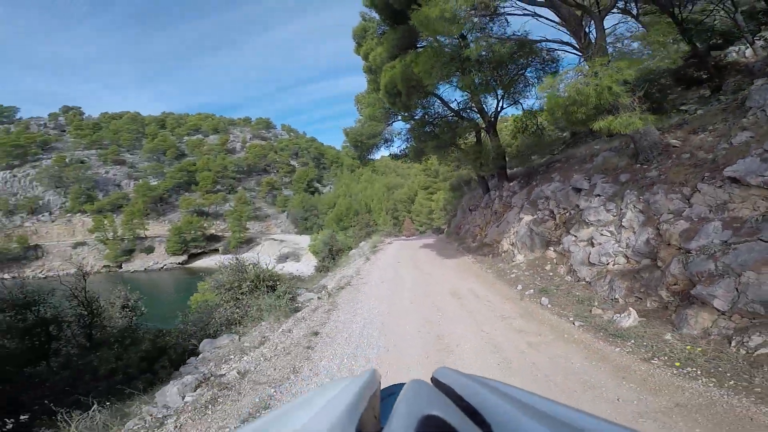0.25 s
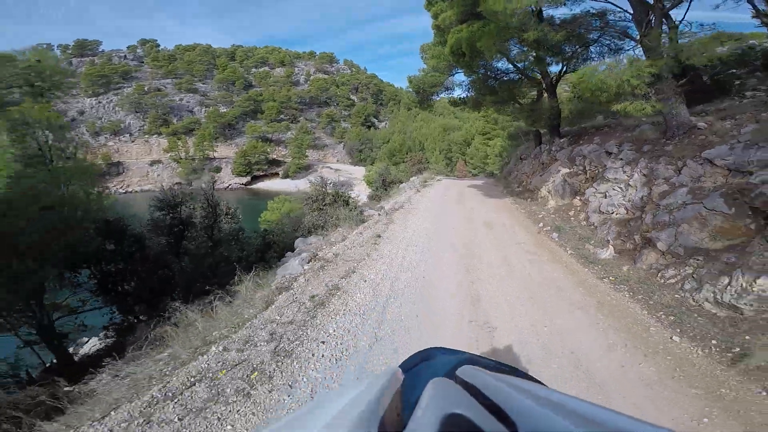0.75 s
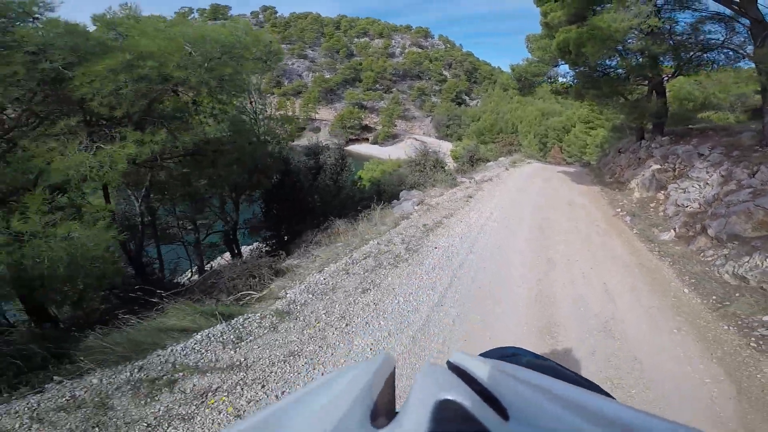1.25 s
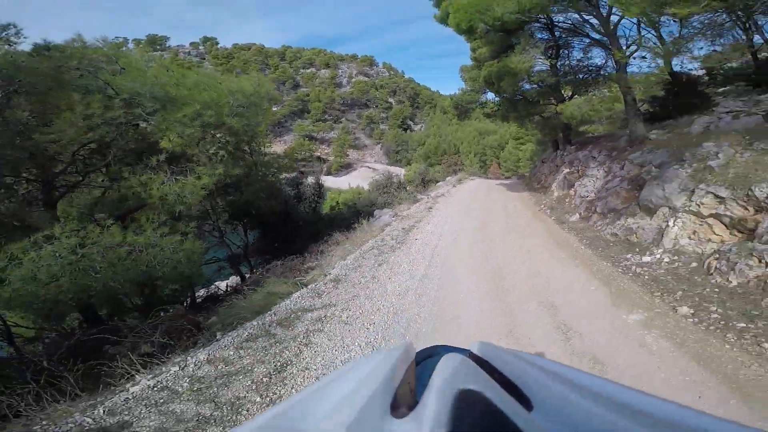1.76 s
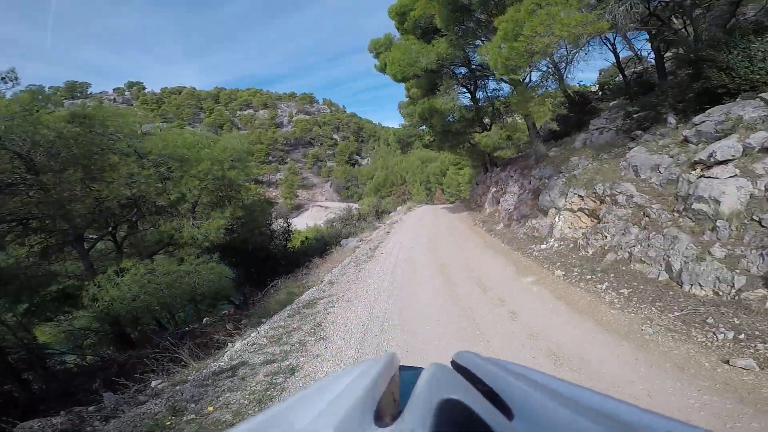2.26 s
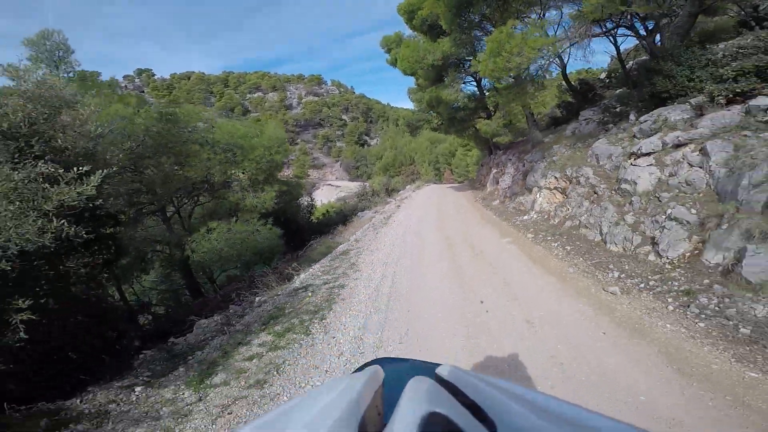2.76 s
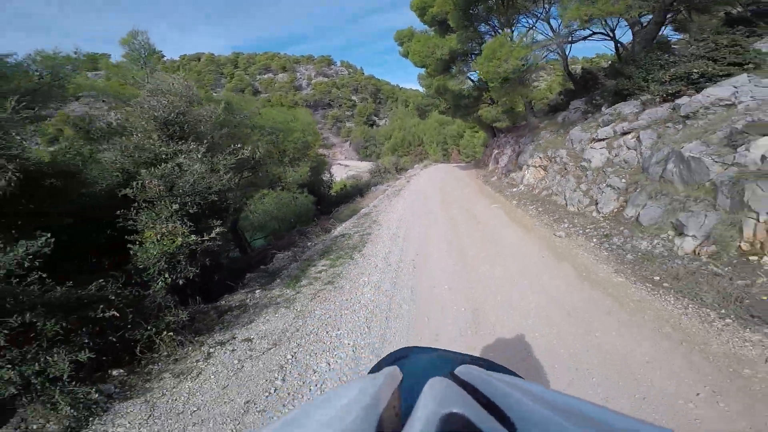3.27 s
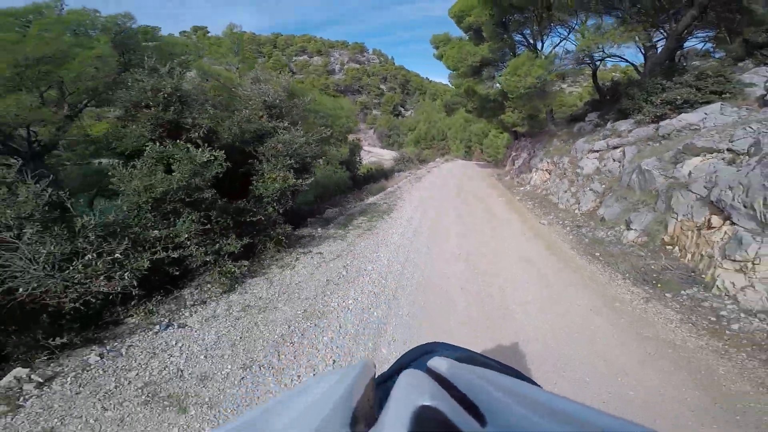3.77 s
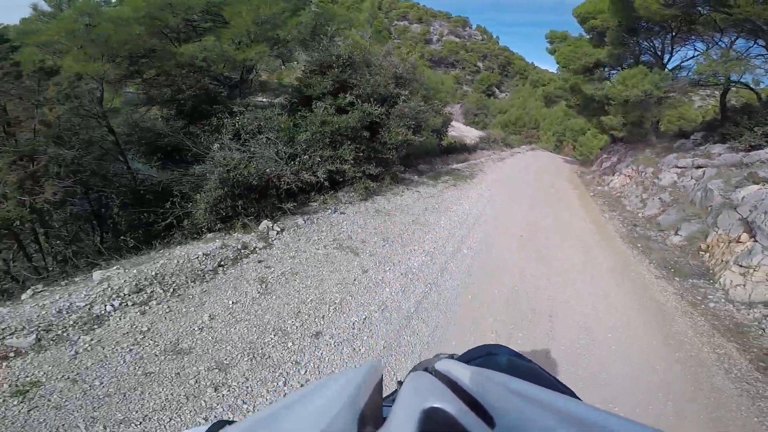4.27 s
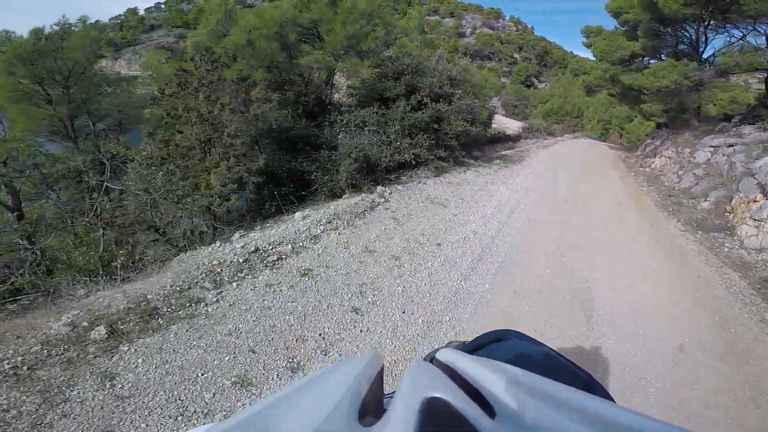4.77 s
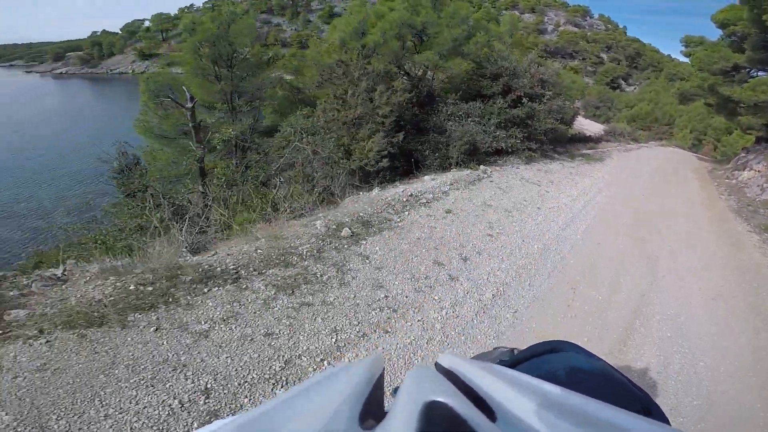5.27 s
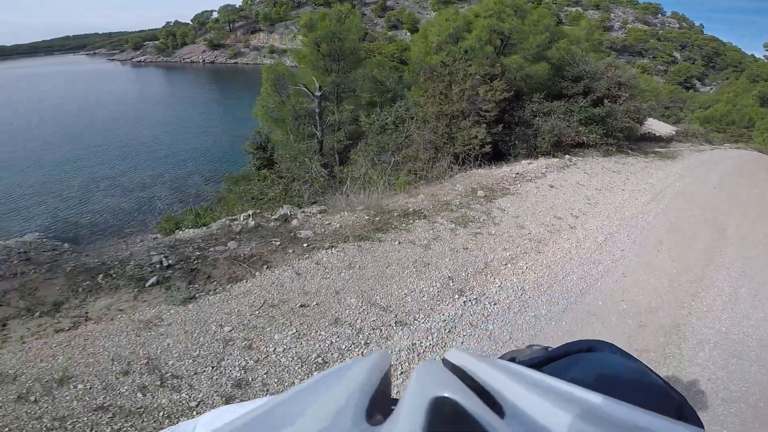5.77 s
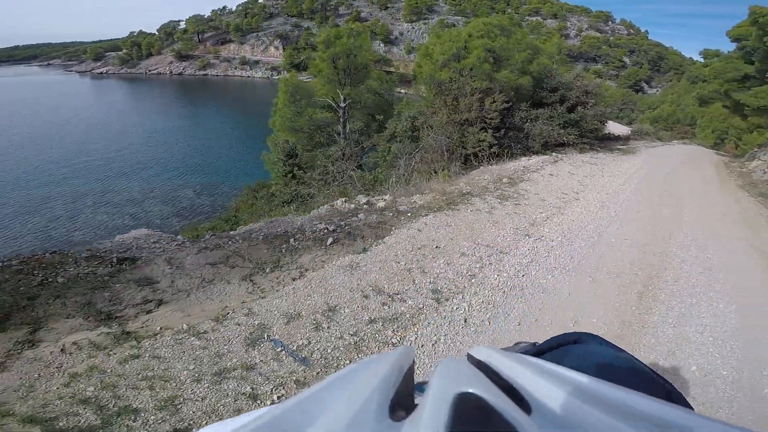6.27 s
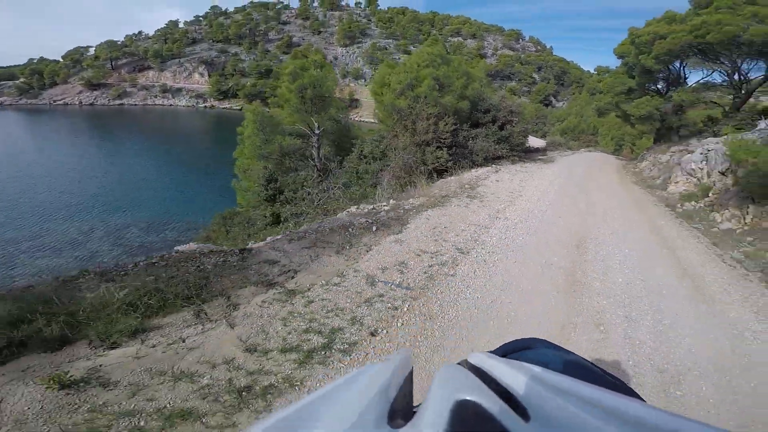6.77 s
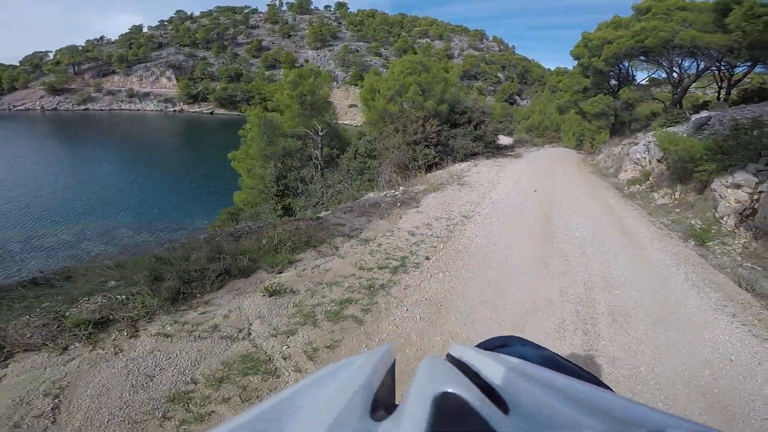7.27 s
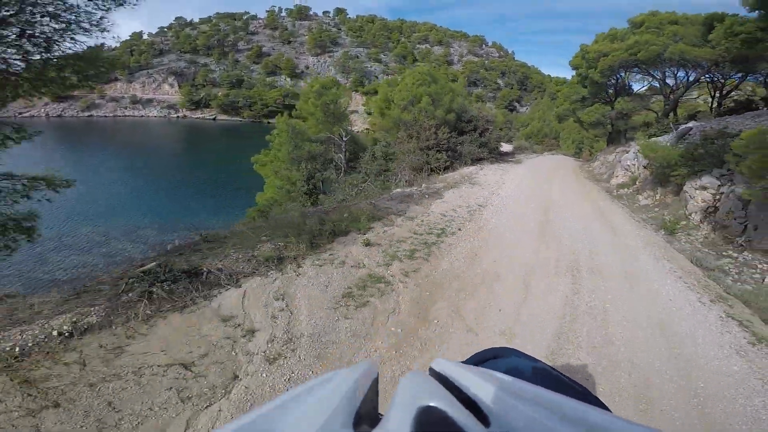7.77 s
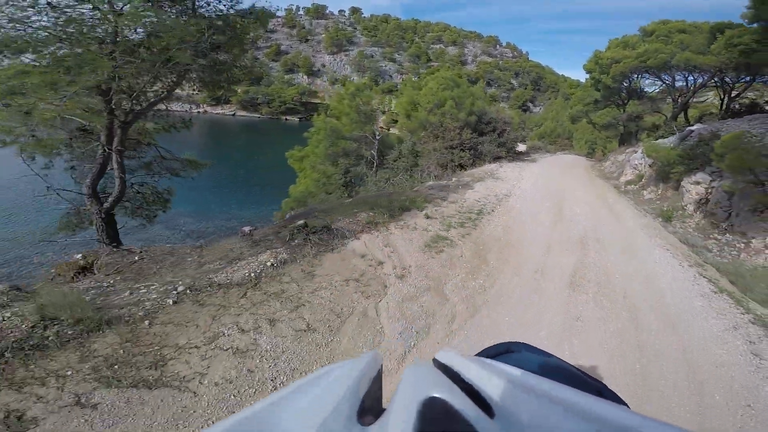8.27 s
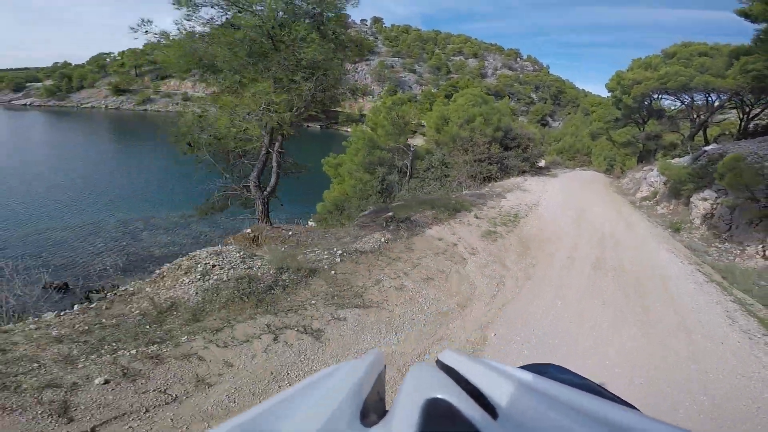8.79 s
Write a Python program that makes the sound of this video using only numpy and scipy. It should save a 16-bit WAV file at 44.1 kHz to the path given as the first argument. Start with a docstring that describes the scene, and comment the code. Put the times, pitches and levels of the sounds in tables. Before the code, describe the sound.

Low wind thuds and rumbles over a close microphone while bicycle tyres crackle through gravel, loose parts clicking and bumps booming dully.

```python
"""On a loose gravel track a bicycle rolls along, heard from a camera riding just above the helmet.
Wind is slow and deep noise that swells in gusts; bumps set the resonances of the camera mount ringing.
Tyres crunch as clumps of tiny random contacts ring the bicycle and the grit; pebbles snap and one stone pops.
Loose parts clack as short buzzes with a strike, a brake rubs in two touches as a wavering tone with
overtones, and a thin steady hiss with a faint whine lies on top."""
import sys
import numpy as np
from scipy import signal
from scipy.fft import rfft, irfft, next_fast_len
from scipy.io import wavfile
from scipy.ndimage import uniform_filter1d

SR = 44100
rng = np.random.default_rng(int(sys.argv[2]) if len(sys.argv) > 2 else 0)


def inscribe(sig):
    """Save sig as 16-bit PCM at rate SR to the path in sys.argv[1].

    A 1-D sig is mono; a 2-D sig holds one channel per row.
    Samples are clipped to [-1, 1] before scaling.
    """
    pcm = np.round(np.clip(np.atleast_2d(sig).T, -1, 1) * 32767)
    wavfile.write(sys.argv[1], SR, pcm.astype(np.int16))


N = 398223  # length in samples, about 9 s
TIME_S = np.arange(N) / SR
LEAD_S = 0.008  # the soft onset of pebbles and buzzes starts this long before their listed time


def from_db(db):
    """Turn decibels into a gain."""
    return 10 ** (np.asarray(db) / 20)


def rms_one(x):
    """Scale a signal to unit power."""
    return x / np.sqrt(np.mean(x ** 2) + 1e-20)


def in_time(rows):
    """Draw each column of a timed table as a curve with a value at every sample."""
    s, *columns = np.transpose(rows)
    return [np.interp(TIME_S, s, column) for column in columns]


def swells(rows, base_db, attack_s, release_s):
    """A level in dB that rises from its base, holds and falls back for each row."""
    rise_db = np.zeros(N)
    for s, length_s, db in rows:
        corners_s = [s - attack_s, s, s + length_s, s + length_s + release_s]
        shape = np.interp(TIME_S, corners_s, [0, 1, 1, 0])
        rise_db = np.maximum(rise_db, (db - base_db) * shape)
    return base_db + rise_db


def drift(rate_hz):
    """Slow random wandering with spread 1, computed at every 40th sample."""
    r = np.exp(-80 * np.pi * rate_hz / SR)
    slow = signal.lfilter([1], [1, -2 * r, r * r], rng.standard_normal(N // 40 + 2002))
    slow = slow[2000:]  # skip the filter's start
    return np.interp(np.arange(N) / 40, np.arange(len(slow)), rms_one(slow))


def noise(spectrum):
    """Noise of unit power whose colour follows a spectrum table."""
    size = next_fast_len(N)
    hz, db = np.transpose(spectrum)
    bins_hz = np.maximum(np.arange(size // 2 + 1) * SR / size, 1)
    gain = from_db(np.interp(np.log(bins_hz), np.log(hz), db, left=-120, right=-120))
    return rms_one(irfft(rfft(rng.standard_normal(size)) * gain, size)[:N])


def evened(x, seconds):
    """Hold the slow level of a signal near one."""
    size = max(int(seconds * SR), 2)
    power = uniform_filter1d(uniform_filter1d(x ** 2, size), size)
    return x / np.sqrt(power + 1e-9)


def resonate(x, modes):
    """Ring side-by-side resonances of alternating sign; a narrower one rings longer."""
    out = 0
    for k, (hz, width_hz, db) in enumerate(modes):
        r = np.exp(-np.pi * width_hz / SR)
        poles = [1, -2 * r * np.cos(2 * np.pi * hz / SR), r * r]
        ring = signal.lfilter([1, 0, -1], poles, x + 1e-18)
        out = out + (-1) ** k * from_db(db) * (1 - r * r) / 2 * ring
    return out


def soften(x, edge_hz):
    """A blunt contact carries little treble."""
    return signal.sosfilt(signal.butter(2, min(edge_hz, .45 * SR), fs=SR, output="sos"), x)


def grains(per_s, spread_db, clump_db):
    """Random contacts, mostly small, that come in clumps."""
    born = rng.random(N) < per_s * from_db(clump_db * drift(14)) / SR
    sizes = from_db(spread_db * np.minimum(rng.exponential(1, N), 4))
    return born * sizes * rng.choice([-1, 1], N)


def blow(modes, chatter, chatter_s, edge_hz):
    """One contact and its dying chatter set modes ringing; peak 1."""
    t = np.arange(SR // 6) / SR
    force = chatter * rng.standard_normal(len(t)) * np.exp(-t / chatter_s)
    force[0] = 1
    ring = soften(resonate(force, modes), edge_hz)
    return ring / np.abs(ring).max()


def add(out, s, sound):
    """Mix a short sound in at time s."""
    start = int(np.clip(s * SR, 0, N - 1))
    out[start:start + len(sound)] += sound[:N - start]


# gusts on the microphone: start_s, length_s, level_db (before the buffeting trim)
WIND_GUSTS = [(0.12, 0.14, -17.5), (0.6, 0.14, -19.5), (0.89, 0.11, -17), (1.18, 0.16, -15),
              (1.55, 0.035, -18), (1.96, 0.14, -13.5), (2.35, .08, -23), (2.57, 0.054, -14),
              (2.91, 0.071, -18), (3.1, 0.2, -18.5), (3.37, 0.12, -13.5), (3.57, 0.064, -14),
              (3.96, 0.16, -14.5), (4.24, 0.081, -11.5), (4.4, 0.49, -18.5), (4.96, 0.18, -15),
              (5.26, 0.068, -12), (5.43, 0.11, -15), (5.61, 0.069, -13), (5.75, 0.079, -18.5),
              (6.12, 0.3, -16), (6.56, 0.14, -17.5), (6.73, 0.073, -12), (6.86, 0.11, -13.5),
              (7.06, 0.11, -19), (7.23, 0.041, -17.5), (7.38, 0.24, -22), (7.95, 0.068, -13.5),
              (8.6, 0.35, -19)]
# colour of the deep buffeting: pitch_hz, level_db (per Hz, relative)
BUFFET_COLOUR = [(11, 2), (16, -0.5), (20, 4.5), (25, -3), (33, -7.5), (41, -12), (51, -18), (63, -23.5),
                 (85, -33.5), (130, -37.5), (300, -61)]
# colour of the softer rush: pitch_hz, level_db (per Hz, relative)
RUSH_COLOUR = [(40, 1), (62, 10.5), (85, 10), (150, 5.5), (220, 0), (300, -3), (400, -8), (550, -11),
               (720, -14.5), (1200, -17.5), (2000, -24), (4000, -40)]


def wind(headwind_db=-24, attack_s=0.04, release_s=0.067, buffet_trim_db=-5.0,
         sway_db=-23.5, sway_hz=10.4, sway_width_hz=5.76, sway_follows=0.77,
         rush_db=-46.0, rush_follows=0.05, flutter_db=1.5):
    """Large eddies sway the air, smaller ones thud on the port; a softer rush swells slightly with them."""
    level_db = swells(WIND_GUSTS, headwind_db, attack_s, release_s)
    gust_db = level_db - level_db.mean()
    band = [(sway_hz, sway_width_hz, 0)]
    eddies = resonate(resonate(rng.standard_normal(N), band), band)
    sway = from_db(sway_db + sway_follows * gust_db) * evened(eddies, seconds=0.23)
    buffet = from_db(level_db + buffet_trim_db) * evened(noise(BUFFET_COLOUR), seconds=0.081)
    rush_level_db = rush_db + rush_follows * gust_db + flutter_db * drift(25.5)
    rush = from_db(rush_level_db) * noise(RUSH_COLOUR)
    # 10 ms fades at both ends
    ease = np.interp(TIME_S, [0, .01, N / SR - .01, N / SR], [0, 1, 1, 0])
    return ease * (sway + buffet + rush)


# stony stretches of the track: start_s, length_s, roughness_db (over the usual ground)
STONY_STRETCHES = [(0.15, 0.17, -2), (1.23, 0.2, 3.5), (1.95, 0.11, 4), (2.25, 0.39, 0.5), (2.9, 0.1, 5),
                   (3.36, 0.03, 5.5), (4.03, 0.24, 4), (4.84, 0.26, 5.5), (5.3, 0.39, 3), (5.88, 0.46, 2.5),
                   (6.68, 0.23, 3.5), (7.15, 0.12, 2), (7.93, 0.21, 2.5), (8.63, 0.53, 3)]


def track_roughness():
    """Roughness in dB that rises and falls as the wheels cross stony stretches."""
    return swells(STONY_STRETCHES, 0, attack_s=0.078, release_s=0.054)


# bumps that jolt the mount: start_s, level_db (before trim), hardness_hz (a harder push reaches higher)
MOUNT_BUMPS = [(0.238, -22.5, 131), (2.289, -26.5, 170), (2.563, -20, 300), (2.908, -15.5, 393),
               (2.95, -17.5, 260), (3.155, -25.5, 150), (3.399, -14.5, 380), (3.4068, -17.5, 280),
               (4.081, -17, 328), (4.854, -20, 110), (4.919, -25.5, 110), (5.006, -22, 149),
               (5.172, -21, 130), (5.333, -23, 109), (5.409, -24, 130), (5.623, -23, 130),
               (6.829, -22, 150), (6.934, -35, 150), (7.234, -29.5, 150), (8.008, -26, 170)]
# resonances of the camera mount: pitch_hz, width_hz, level_db (relative)
MOUNT_MODES = [(94.4, 37.2, -6), (128.4, 11.7, 5), (176, 8, -8.5), (263, 51, -21), (296.6, 50, -17.5),
               (388, 230, -31.5)]


def mount(rough_db, shake_db=-49, shake_follows=1.94, bump_trim_db=-5.0, judder=0.005, judder_s=0.052,
          hardening_db=4.5, punch_s=0.02, settle_s=0.013, after_db=-1.0,
          lurch_hz=48, lurch_width_hz=22, lurch_db=-13.0, thud_hz=230, thud_width_hz=260, thud_db=-19.5):
    """Rough ground keeps the mount humming; a bump thuds, swings it with a fading judder and lurches deeply."""
    hum = evened(resonate(rng.standard_normal(N), MOUNT_MODES), seconds=0.13)
    out = from_db(shake_db + shake_follows * rough_db) * hum
    lurch_mode = [(lurch_hz, lurch_width_hz, 0)]
    thud_mode = [(thud_hz, thud_width_hz, 0)]
    for s, db, hardness_hz in MOUNT_BUMPS:
        # a harder push excites the upper modes and the thud more
        lift_db = hardening_db * np.log2(hardness_hz / MOUNT_MODES[2][0])
        upper = [(hz, width_hz, level_db + lift_db) for hz, width_hz, level_db in MOUNT_MODES[2:]]
        swing = blow(MOUNT_MODES[:2] + upper, judder, judder_s, edge_hz=292)
        # after the first punch the swing eases slightly
        t = np.arange(len(swing)) / SR
        settling_db = np.interp(t, [punch_s, punch_s + settle_s], [0, after_db])
        lurch = from_db(lurch_db) * blow(lurch_mode, judder, judder_s, edge_hz=140)
        thud = from_db(thud_db + lift_db) * blow(thud_mode, judder, judder_s, edge_hz=324)
        add(out, s, from_db(db + bump_trim_db) * (from_db(settling_db) * swing - lurch - thud))
    return out


# resonances of the bicycle and helmet shell, also rung by the knocks: pitch_hz, width_hz, level_db (relative)
BODY_MODES = [(565, 50, -1), (851, 109, -1), (1053, 239, 0), (1258, 139, 2), (1343, 55, 1.5),
              (1676, 77, -4.5), (1896, 164, -16), (2430, 590, -18.5), (2890, 120, -17), (3910, 330, -17),
              (4330, 430, -14.5), (5920, 460, -14)]


def stones(rough_db, crunch_db=-62.5, growth_db_per_s=0.1747, edge_hz=3500, patch_db=3.0):
    """Stones shift under the tread in small slides and sound the bicycle's modes; the track gets coarser."""
    contacts = from_db(patch_db * drift(46)) * grains(per_s=480, spread_db=3.0, clump_db=3.5)
    crunch = rms_one(resonate(soften(contacts, edge_hz), BODY_MODES))
    return from_db(crunch_db + growth_db_per_s * TIME_S + rough_db) * crunch


# loose fine grit under the tyres, also guiding stray pebbles: time_s, level_db (before trim)
LOOSE_GRIT_LEVEL = [(0, -67), (.75, -71.5), (1.15, -69.5), (1.7, -70), (2.1, -65), (2.7, -69.5),
                    (3.35, -70.5), (3.65, -77.5), (4.1, -70.5), (4.5, -80.5), (4.9, -69.5), (5.5, -71),
                    (5.75, -65.5), (6.1, -69.5), (6.8, -73.5), (7.6, -67.5), (8.5, -73.5), (9.03, -70.5)]
# pitch that the grit favours, also used for stray pebbles: time_s, pitch_hz
FAVOURED_PITCH = [(0, 2850), (1.3, 3780), (2.1, 3070), (3.4, 3250), (4.5, 2060), (5.9, 3500), (7.3, 2060),
                  (9, 2260)]
# resonances of the grit: pitch_hz, width_hz, level_db (relative)
GRIT_MODES = [(1555, 180, 3), (2173, 65, 4.5), (2480, 130, -1), (2890, 93, 1.5), (3570, 130, -3.5),
              (3900, 160, -7.5), (4220, 220, -6), (6000, 340, -13)]


def grit(trim_db=-0.6, focus_db=7.5, focus_octaves=0.44, own_share=0.66, patch_db=1.0, edge_hz=7000):
    """Fine grit crackles in patches; finer grit rings higher, and modes near the favoured pitch are lifted."""
    level_db, = in_time(LOOSE_GRIT_LEVEL)
    favoured_hz, = in_time(FAVOURED_PITCH)
    shared = grains(per_s=300, spread_db=2.5, clump_db=2.5)
    out = 0
    for hz, width_hz, db in GRIT_MODES:
        # every mode hears the shared contacts plus some of its own
        own = own_share * grains(per_s=260, spread_db=2.5, clump_db=6.0)
        contacts = shared * rng.choice([-1, 1], N) + own
        nearness = np.exp(-(np.log2(hz / favoured_hz) / focus_octaves) ** 2)
        out = out + from_db(focus_db * nearness) * resonate(contacts, [(hz, width_hz, db)])
    crackle = rms_one(from_db(patch_db * drift(40)) * soften(out, edge_hz))
    return from_db(level_db + trim_db) * crackle


def stray_pebbles(count=290, over_grit_db=12, spread_db=3, spread_octaves=.25, clack_db=5.5):
    """Draw extra pebbles at random, in clusters where the grit lies loose and near its favoured pitch."""
    grit_db, = in_time(LOOSE_GRIT_LEVEL)
    favoured_hz, = in_time(FAVOURED_PITCH)
    chance = np.cumsum(from_db(grit_db + 5 * drift(6)))
    strays = []
    for i in np.searchsorted(chance, chance[-1] * rng.random(size=count)):
        hz = favoured_hz[i] * 2 ** (spread_octaves * rng.uniform(-1.16, 1))
        db = grit_db[i] + over_grit_db + spread_db * rng.normal()
        strays.append((i / SR, hz, db, clack_db))
    return strays


# pebbles that snap against each other: start_s, pitch_hz, level_db (before trim), clack_db (before lift)
SNAPPING_PEBBLES = [(0.038, 3000, -43.5, 2.5), (0.110, 3400, -54, -8), (0.141, 2900, -49, 4),
                    (0.262, 3730, -50, -5), (0.275, 3660, -45.5, -8), (0.354, 2890, -44, 10),
                    (0.472, 3500, -56, -8), (0.635, 3350, -54, -11), (0.871, 3650, -48, -2),
                    (1.069, 3760, -52, -13), (1.189, 3950, -50, -2), (1.377, 3900, -51, -2),
                    (1.634, 3750, -52, 3), (1.877, 3540, -50, -6), (1.901, 3120, -47, 2),
                    (1.998, 3000, -49, 3), (2.157, 3400, -51, -5), (2.219, 2980, -46.5, -4),
                    (2.444, 2690, -48, -2), (2.697, 3430, -50.5, -8), (2.890, 3630, -51, -4),
                    (2.930, 3180, -43, 4), (2.9465, 3000, -44.5, -5), (3.3455, 2870, -44, -1),
                    (3.366, 2400, -51, -8), (3.9055, 3000, -51, 3), (5.646, 3900, -51, -4),
                    (5.662, 3500, -48, 0), (5.724, 3700, -54, -7), (5.754, 3000, -55, -8),
                    (5.841, 3100, -48, 3), (6.119, 2780, -45.5, -4), (6.224, 3400, -44, 2),
                    (7.455, 2800, -56, -6), (8.813, 2800, -50, 1)]


def pebbles(trim_db=-3.5, width_hz=600, lower_ratio=0.7, lower_db=-1.0,
            clack_hz=1240, clack_width_hz=330, clack_lift_db=5.5,
            attack_s=0.0025, rise_s=0.0021, release_s=0.0029, edge_hz=4400):
    """Each pebble scrapes for an instant at its own pitch, with a lower partner and a low clack."""
    out = np.zeros(N)
    t = np.arange(SR // 20) / SR - LEAD_S
    shape = np.exp(np.minimum((t - attack_s) / rise_s, (attack_s - t) / release_s))
    top = signal.butter(6, min(edge_hz, .45 * SR), fs=SR, output="sos")
    for s, hz, db, clack_db in list(SNAPPING_PEBBLES) + stray_pebbles():
        modes = [(hz, width_hz, 0), (hz * lower_ratio, width_hz, lower_db),
                 (clack_hz, clack_width_hz, clack_db + clack_lift_db)]
        ring = resonate(rng.standard_normal(len(t)), modes)
        scrape = evened(signal.sosfilt(top, ring), seconds=0.0021)
        add(out, s - LEAD_S, from_db(db + trim_db) * shape * scrape)
    return out


# one stone squeezed out from under the tyre: start_s, level_db (peak of the first crack)
STONE_POP = (8.6660, -24)
# resonances of that stone: pitch_hz, width_hz, level_db (relative)
POP_MODES = [(930, 110, -5), (1297, 130, -2), (2270, 69, -14), (2550, 85, -16.5), (2820, 110, -18),
             (3530, 310, -13), (4020, 260, -15.5), (5500, 540, -26)]


def pop(skip_s=0.005, skip_db=-21.0):
    """One larger stone shoots out with a dry crack and skips once, more softly."""
    out = np.zeros(N)
    s, db = STONE_POP
    for delay_s, drop_db in ((0, 0), (skip_s, skip_db)):
        crack = blow(POP_MODES, chatter=0.023, chatter_s=0.0099, edge_hz=2700)
        add(out, s + delay_s, from_db(db + drop_db) * crack)
    return out


# knocks of loose parts: start_s, level_db (before trims), length_s, treble_db (added above 1500 Hz)
LOOSE_KNOCKS = [(0.908, -39.5, 0.003, -8), (1.318, -41, .005, 0), (1.976, -43.5, .004, -2),
                (2.444, -42.5, 0.0058, -1), (2.911, -40, 0.0035, -8), (2.956, -36, 0.0042, -5),
                (3.332, -45, .004, -2), (3.4, -40, .005, -10), (3.415, -34, 0.0037, -22),
                (3.435, -45, 0.0088, -4), (4.107, -37.5, 0.0046, -5), (4.239, -46, 0.0093, -7),
                (4.255, -37, 0.0056, 5), (4.259, -29.5, 0.0036, -7), (4.28, -43, 0.0047, -11),
                (4.606, -34.5, 0.0058, -0.5), (4.844, -36, 0.0065, 0), (4.856, -41, .003, -10),
                (4.992, -43, 0.0033, -5), (5.171, -46, 0.0032, -15), (5.395, -33, 0.0024, -6),
                (5.475, -42.5, 0.0023, -4), (5.627, -40, 0.0056, -4), (6.015, -36.5, 0.0035, -6),
                (6.119, -41, .004, -24), (6.552, -43.5, 0.0027, -5), (6.631, -35, 0.0041, -3),
                (6.639, -38, 0.0026, -10), (6.69, -44, 0.0033, 0), (6.702, -43.5, 0.0093, -2),
                (6.751, -39.5, 0.0045, 1), (6.758, -39, .004, -1), (6.933, -36.5, 0.0039, -2),
                (6.974, -42.5, .004, -8), (7.232, -33.5, 0.0038, -2), (7.489, -41, .003, -7),
                (7.795, -42.5, 0.003, 2), (7.979, -41, .005, -3), (8.636, -46, 0.003, 1),
                (8.743, -44, 0.003, 2)]


def knocks(buzz_trim_db=-5.5, attack_s=0.0018, rise_s=0.0023, release_s=0.0037, tail_db=-9.0, tail_ratio=2.4,
           edge_hz=2800, bass_db=0.0, strike_trim_db=-11.0, strike_lag_s=0.00198):
    """A loose part clacks as a short buzz with a soft onset, a strike and a rattling tail."""
    out = np.zeros(N)
    t = np.arange(SR // 12) / SR - LEAD_S
    rising = np.exp(np.minimum(t - attack_s, 0) / rise_s)
    for s, db, length_s, treble_db in LOOSE_KNOCKS:
        modes = [(hz, width_hz, level_db + treble_db * (hz > 1500) + bass_db * (hz < 700))
                 for hz, width_hz, level_db in BODY_MODES]
        ring = resonate(rng.standard_normal(len(t)), modes)
        buzz = evened(soften(ring, edge_hz), seconds=0.0025)
        # a longer buzz leaves a longer tail
        after_s = np.maximum(t - length_s, 0)
        tail = from_db(tail_db) * np.exp(-after_s / (tail_ratio * length_s))
        dying = np.maximum(np.exp(-after_s / release_s), tail)
        add(out, s - LEAD_S, from_db(db + buzz_trim_db) * rising * dying * buzz)
        strike = blow(modes, chatter=0.018, chatter_s=0.015, edge_hz=edge_hz)
        add(out, s + strike_lag_s, from_db(db + strike_trim_db) * strike)
    return out


# brake rub in two touches: time_s, pitch_hz, level_db, overtone_db (second partial over the first)
BRAKE_RUB = [(2.1, 850, -80, -8), (2.17, 850, -70, -10), (2.26, 855, -63, -12), (2.325, 845, -55, -10),
             (2.37, 842, -73, -3), (2.44, 856, -68, -5), (2.49, 848, -58, -11), (2.54, 866, -64, 1),
             (2.59, 845, -72, -4), (2.75, 846, -76, 1)]


def brake(waver=0.026, wander=0.00516, fall_db=-12.0, catch_db=3.5, roughness=0.4):
    """A pad rubs the disc twice with a faint, rough tone that wavers, catches and turns shrill."""
    hz, db, overtone_db = in_time(BRAKE_RUB)
    wavering_hz = hz * (1 + waver * drift(70.0) + wander * drift(8.9))
    phase = 2 * np.pi * np.cumsum(wavering_hz) / SR
    overtones = 0
    for k in range(3):  # partials 2 to 4, each weaker
        rough = 1 + roughness * drift(45)
        overtones = overtones + from_db(fall_db * k) * rough * np.sin((k + 2) * phase)
    touching = (TIME_S > BRAKE_RUB[0][0]) & (TIME_S < BRAKE_RUB[-1][0])
    tone = np.sqrt(2) * (np.sin(phase) + from_db(overtone_db) * overtones)
    return touching * from_db(db + catch_db * drift(22)) * tone


# colour of the hiss: pitch_hz, level_db (per Hz, relative)
HISS_COLOUR = [(2000, -17), (4000, -5), (5000, -5), (6000, -3.5), (6900, -6), (7600, -4), (8300, -1),
               (8900, 1.5), (10200, -1), (11600, -5.5), (12800, -6), (14000, -11), (15200, -21)]


def hiss(hiss_db=-67.5, whine_hz=8575, whine_width_hz=130, whine_db=-76.5):
    """Steady bright noise with a faint narrow band of noise that whines in it."""
    whine = resonate(rng.standard_normal(N), [(whine_hz, whine_width_hz, 0)])
    return from_db(hiss_db) * noise(HISS_COLOUR) + from_db(whine_db) * rms_one(whine)


def scene():
    """Rough ground shakes the mount and crunches the stones; all meets at one microphone in open air."""
    rough_db = track_roughness()
    tyres = stones(rough_db) + grit() + pebbles() + pop()
    return (wind() + mount(rough_db) + tyres + knocks() + brake() + hiss())[None]


def record(dry, cutoff_hz=15200):
    """The top is cut steeply above the cutoff."""
    return signal.sosfilt(signal.ellip(10, .2, 80, cutoff_hz, fs=SR, output="sos"), dry)


dry = scene()
out = record(dry)
inscribe(out)
```